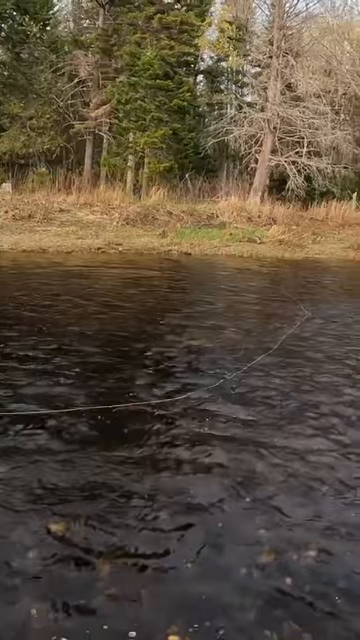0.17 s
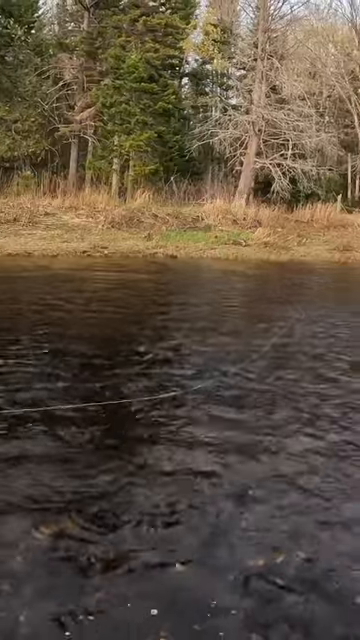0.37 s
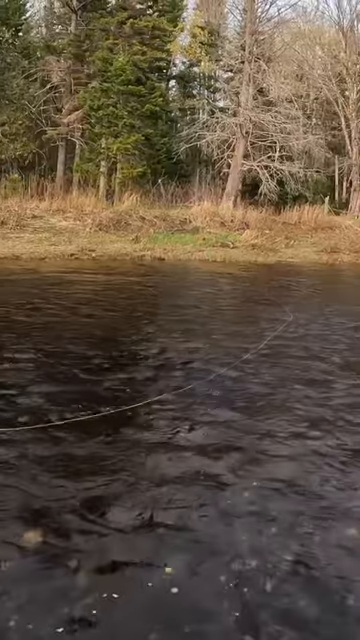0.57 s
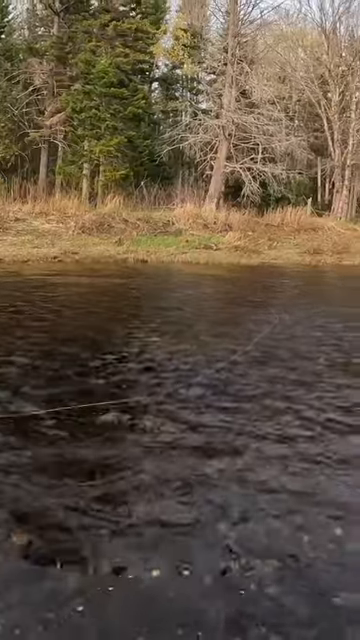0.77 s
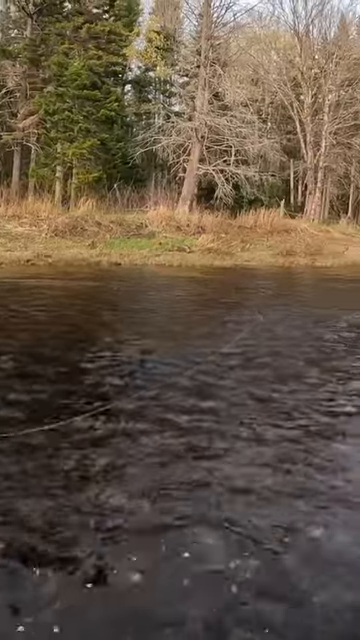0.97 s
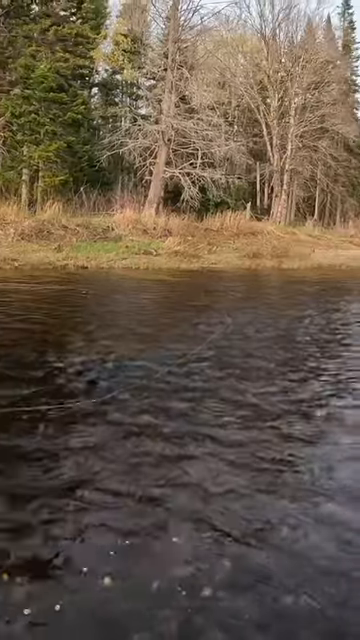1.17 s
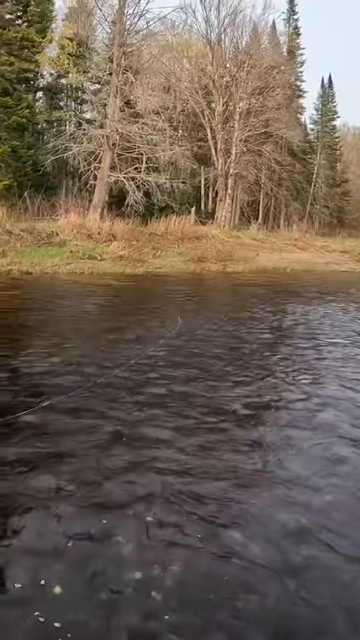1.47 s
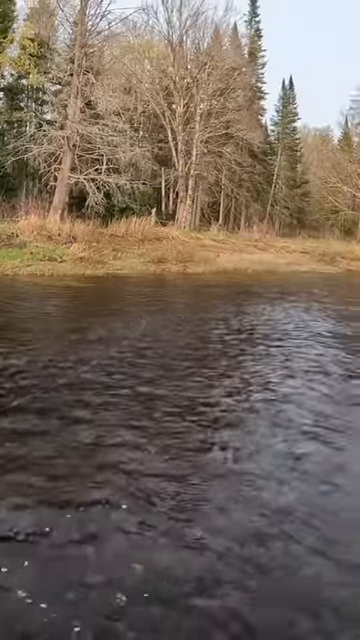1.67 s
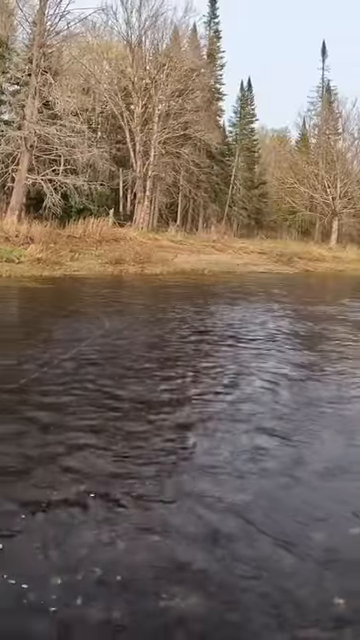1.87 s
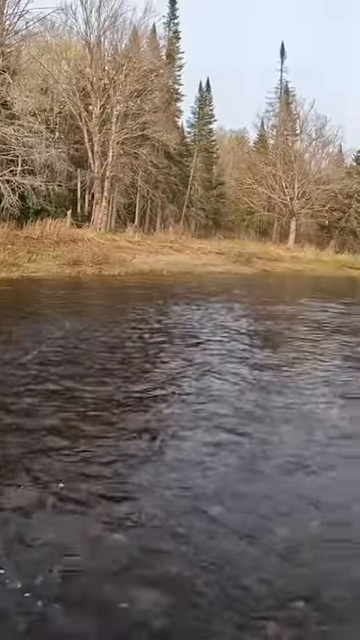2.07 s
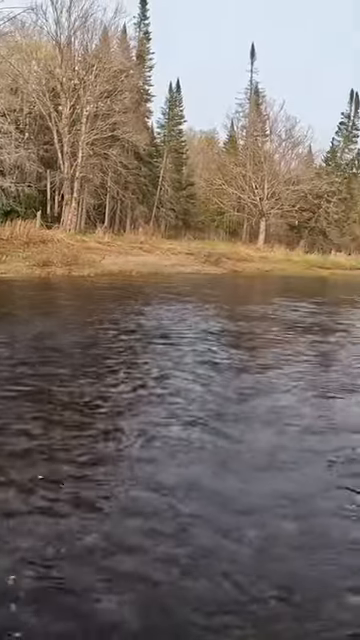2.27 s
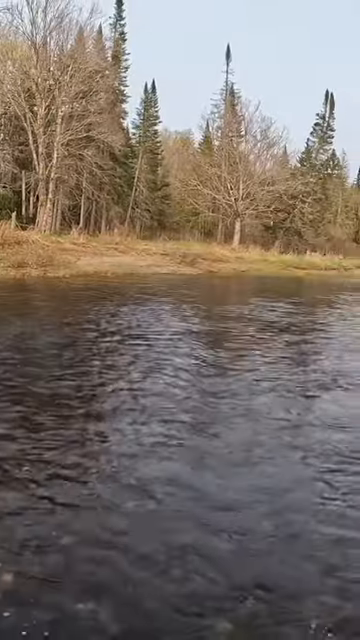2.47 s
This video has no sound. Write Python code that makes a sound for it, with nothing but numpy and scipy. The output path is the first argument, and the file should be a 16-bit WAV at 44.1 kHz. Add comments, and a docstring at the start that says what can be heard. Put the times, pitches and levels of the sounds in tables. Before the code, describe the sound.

River water bubbles, gulps and laps nearby throughout, as low wind buffets the microphone and gradually eases. Slightly to the left, a fishing reel gives a few small clicks, a tiny whirr and some final ticks, with faint line hiss.

```python
"""Fishing by a shallow river

Bubbles ring, hollows gulp and wavelets slap close by, over the steady wash of the current.
The reel clicks as its pawl (a springy catch) drops onto a gear's teeth. It whirrs briefly
as line is pulled off, and ticks again at the end.
The line hisses as it slides through the rod rings, while wind buffets the microphone."""
import sys
import numpy as np
from scipy import signal
from scipy.io import wavfile

SR = 44100
rng = np.random.default_rng(int(sys.argv[2]) if len(sys.argv) > 2 else 0)


def persist_wave(psi):
    """Save psi, clipped to +-1, as 16-bit WAV."""
    counts = np.round(np.clip(psi, -1, 1) * 32767).astype(np.int16)
    wavfile.write(sys.argv[1], SR, np.atleast_2d(counts).T)


N = 115101
T = np.arange(N) / SR

# How alike a noise is in both ears. Each row: frequency in Hz, likeness from 0 to 1.
EAR_LIKENESS = [(30, 0.7), (80, 0.99), (200, 0.59), (500, 0.98), (1200, 0.86), (2500, 0.42), (5000, 1),
                (9000, 0.58), (13000, 0)]

# Wind strength. Each row: time in seconds, rumble level in dB, flutter level in dB.
WIND_LEVELS = [(0, -37.5, -38.5), (0.2, -33.5, -41.5), (0.43, -33, -38.5), (0.72, -34.5, -43),
               (0.81, -34.5, -40.5), (0.89, -34.5, -33.5), (0.96, -27, -41), (1.07, -33, -42),
               (1.13, -34.5, -50.5), (1.19, -30, -45), (1.3, -35.5, -40), (1.5, -33, -38),
               (1.68, -43, -43.5), (1.76, -37, -43.5), (1.93, -31.5, -35.5), (2.09, -40, -39),
               (2.2, -38.5, -53), (2.35, -44, -48), (2.48, -36, -60.5), (2.61, -51.5, -54)]
# Tone of the deep rumble and of the higher flutter. Each row: frequency in Hz, relative level in dB.
RUMBLE_TONE = [(20, -5.5), (33, -1.5), (50, -7), (70, -21), (120, -41.5)]
FLUTTER_TONE = [(35, -24), (65, 2), (95, -7), (130, -9), (190, -20), (280, -29.5), (500, -38.5)]
# Single thumps of wind. Each row: time in seconds, level in dB, width in seconds.
WIND_THUMPS = [(.396, -20.5, 0.0037), (0.793, -18, 0.0038), (0.94, -19.5, 0.003), (1.361, -22.5, 0.0037),
               (1.674, -21, 0.0049), (1.934, -26, 0.0036)]

# Tone of the river's wash. Each row: frequency in Hz, relative level in dB.
WASH_TONE = [(200, -12), (370, -10.5), (500, -0.5), (700, 0.5), (1200, -5), (1900, -11), (3000, -25),
             (5000, -34.5), (7400, -30.5), (9500, -45.5), (12400, -59), (14000, -72)]
# Typical strength of the small bubbles and spray. Each row: pitch in Hz, level in dB.
SMALL_BUBBLE_LEVELS = [(380, -60), (500, -46), (700, -55), (1250, -46.5), (1800, -53), (2800, -54),
                       (4500, -59.5), (7500, -52.5)]
# The loudest bubbles, then bursting droplets. Each row: start in seconds, pitch in Hz, level in dB.
LOUD_BUBBLES = [(0.029, 499, -29.5), (0.267, 1027, -26.5), (0.288, 543, -30), (0.461, 680, -32),
                (0.464, 1370, -30.5), (0.464, 334, -29), (0.495, 698, -37), (0.555, 408, -36),
                (0.653, 780, -30.5), (0.876, 886, -32.5), (0.968, 1440, -32.5), (0.985, 720, -31.5),
                (1.121, 1264, -27), (1.122, 352, -34), (1.127, 1410, -33.5), (1.165, 646, -20),
                (1.227, 843, -29), (1.352, 1165, -28.5), (1.477, 880, -34), (1.553, 625, -33),
                (1.557, 493, -34), (1.596, 1950, -29.5), (1.664, 1250, -27), (1.721, 545, -26),
                (1.768, 1020, -33), (1.785, 526, -27), (1.792, 550, -24.5), (1.802, 675, -30),
                (1.844, 580, -29), (1.986, 693, -33.5), (2.466, 1320, -33.5), (2.478, 596, -34),
                (2.514, 704, -35), (2.575, 765, -32.5)]
BURSTING_DROPLETS = [(0.243, 3200, -43), (.4609, 3590, -33), (0.861, 7060, -47.5), (1.4283, 3450, -43),
                     (1.984, 6600, -42), (2.194, 2410, -38.5)]
# Gulping hollows. Each row: start and length in seconds, first and last pitch in Hz, level in dB.
WATER_GLUGS = [(.065, 0.038, 578, 466, -37), (.37, 0.083, 531, 428, -38), (.61, .11, 460, 520, -50),
               (.82, 0.13, 456.6, 532, -45), (1.04, 0.094, 570, 484, -46.5), (1.315, 0.064, 429, 615, -46),
               (1.67, 0.068, 385, 540, -42.5), (1.86, 0.13, 594.6, 638, -51.5),
               (1.97, 0.069, 476, 532, -47.5), (2.105, 0.065, 609, 460, -39.5),
               (2.255, 0.077, 366, 503, -43.5), (2.35, 0.078, 451.5, 624, -48.5)]
# Wavelets slapping over. Each row: start in seconds, level in dB, middle frequency in Hz.
WAVELET_SLAPS = [(.076, -38, 770), (0.271, -32.5, 1100), (.386, -39, 1060), (0.4601, -39.5, 4560),
                 (0.465, -39, 1140), (0.774, -40.5, 1060), (.957, -38.5, 1000), (1.075, -42.5, 2270),
                 (1.121, -35.5, 890), (1.165, -37.5, 890), (1.228, -37.5, 1050), (1.287, -48.5, 3700),
                 (1.348, -46, 2200), (1.473, -38, 1010), (1.653, -35.5, 1540), (1.723, -38.5, 2040),
                 (1.833, -42, 2130), (1.959, -38.5, 1210), (2.131, -35.5, 1380), (2.465, -36.5, 1390),
                 (2.509, -35, 1040)]

# Strength of the line's hiss. Each row: time in seconds, level in dB.
HISS_LEVELS = [(0, -71), (.40, -69.5), (.45, -61), (.51, -69.5), (.64, -62), (.76, -68.5), (.83, -70.5),
               (.90, -70), (.925, -59), (.99, -61.5), (1.07, -68), (1.12, -73), (1.44, -70), (1.51, -66),
               (1.68, -68), (1.96, -67.5), (2.08, -69)]
# Tone of that hiss. Each row: frequency in Hz, relative level in dB.
HISS_TONE = [(1200, -13), (2800, 1.5), (5000, 0), (7500, -6), (9500, -14.5), (12400, -18), (15000, -34)]
# The line drawing tight. Each row: time in seconds, level in dB, width in seconds.
LINE_RASPS = [(.69, -79.5, .065)]

# The reel's ringing notes. Each row: pitch in Hz, level in dB, seconds to fade by 60 dB.
REEL_NOTES = [(4420, -11, 0.0074), (5010, -6, 0.0049), (6120, -4, 0.003), (7350, -6, 0.0063),
              (9320, -12, 0.0036), (9750, -18, 0.0058), (12500, -7.5, 0.002)]
# Clicks of the pawl. Each row: start in seconds, level in dB, seconds until the bounce,
# bounce level in dB relative to the click, treble cutoff in Hz.
PAWL_CLICKS = [(0.3086, -33, 0.0011, -5.5, 7100), (0.5348, -36.5, 0.0072, -9, 14000),
               (0.565, -36.5, 0.006, -11, 15000), (0.6086, -38, 0.0046, -8, 13000),
               (1.071, -54.5, 0.0063, -2, 9000), (2.1772, -47, 0.0018, -9, 6500)]
# The spool creeping round. Each row: start in seconds, level in dB, pitch in Hz, seconds to fade 60 dB.
SPOOL_TICKS = [(2.5288, -37.5, 6040, 0.013), (2.5748, -36, 5960, 0.013), (2.6045, -36, 6200, 0.0058)]
# The notes in a tick. Each row: multiple of its pitch, level in dB, share of its fade time.
SPRING_NOTES = [(1, 0.5, 1), (1.25, -5.5, 0.42), (1.95, -14, .3)]


def from_db(db):
    """Turn decibels into a number to multiply by."""
    return 10 ** (np.asarray(db) / 20)


def rms_one(x):
    """Scale a signal so its average strength (rms) is 1."""
    return x / np.sqrt(np.mean(x ** 2) + 1e-20)


def in_time(rows):
    """Join a table's timed points with straight lines, one curve per level column."""
    times, *columns = np.transpose(rows)
    return [np.interp(T, times, column) for column in columns]


def at_hz(points, hz):
    """Read a table at any frequency, spacing the octaves evenly."""
    frequencies, values = np.transpose(points)
    return np.interp(np.log(hz), np.log(frequencies), values)


def pan(db):
    """Left and right gains that make the left ear louder by db (quieter if negative)."""
    return from_db(np.array([[db], [-db]]) / 2)


def add(out, start, sound):
    """Mix a sound in at a start time in seconds."""
    i = int(np.clip(start * SR, 0, N - 1))
    out[..., i:i + sound.shape[-1]] += sound[..., :N - i]


def drift(rate_hz):
    """A smooth random wobble of strength 1; a higher rate wobbles faster."""
    r = np.exp(-80 * np.pi * rate_hz / SR)
    slow = signal.lfilter([1], [1, -2 * r, r * r], rng.standard_normal(N // 40 + 2002))[2000:]
    return np.interp(np.arange(N) / 40, np.arange(len(slow)), rms_one(slow))


def ring(force, hz, fade_s):
    """Each push starts a pure note that fades by 60 dB in fade_s seconds."""
    r, w = from_db(-60 / (fade_s * SR)), 2 * np.pi * hz / SR
    return signal.lfilter([0, np.sin(w)], [1, -2 * r * np.cos(w), r * r], force + 1e-18)


def banded_noise(tone, flicker_db, flicker_hz):
    """Stereo noise of strength 1, made of bands that each flicker, less so in the treble."""
    out, edges = 0, np.r_[18, 30, 45, 65, np.geomspace(90, 16000, 25)]
    white = rng.standard_normal((2, 2, N + SR // 4))
    for k, (low, high) in enumerate(zip(edges, edges[1:])):
        hz = np.sqrt(low * high)
        flicker = drift(flicker_hz) / np.hypot(1, hz / 2000)
        if tone[0][0] / 2 < hz < tone[-1][0] * 2:
            band = signal.butter(3, [low, high], "band", fs=SR, output="sos")
            mid, side = signal.sosfilt(band, white[k % 2])[:, -N:]
            alike = np.clip(at_hz(EAR_LIKENESS, hz), -1, 1)
            stereo = np.sqrt(1 + alike) * mid + np.sqrt(1 - alike) * side * [[1], [-1]]
            out = out + from_db(at_hz(tone, hz) + flicker_db * flicker) * stereo
    return rms_one(out)


def wind():
    """Air hits the microphone: a lumpy rumble, a flutter and a few thumps."""
    rumble_db, flutter_db = in_time(WIND_LEVELS)
    out = from_db(rumble_db) * banded_noise(RUMBLE_TONE, flicker_db=1.5, flicker_hz=7.6)
    out += from_db(flutter_db) * banded_noise(FLUTTER_TONE, flicker_db=2.5, flicker_hz=7.6)
    for time, db, width in WIND_THUMPS:
        offset_squared = ((T - time) / width) ** 2
        out -= from_db(db) * (1 - offset_squared) * np.exp(-offset_squared / 2)
    return out * pan(db=-4.5)


def bubble(hz, db, cycles, place):
    """A bubble rings, rising slightly in pitch as it fades by 60 dB over the given cycles."""
    pitch_rise, swell_cycles = 0.029, 0.83
    turns = np.arange(int(cycles / hz * SR)) * hz / SR
    age = turns / cycles
    phase = 2 * np.pi * turns * (1 + pitch_rise * age)
    # Its place across the stream puts one ear's wave a little ahead.
    lead = place * np.interp(hz, [500, 2200, 5000], [.12, .42, .25])
    loudness = (1 - np.exp(-turns / swell_cycles)) * np.exp(-np.log(1000) * age)
    return from_db(db) * loudness * np.sin(phase + lead * np.array([[1], [-1]]))


def bubble_cloud(per_s, low_hz, high_hz, cycles):
    """Many small bubbles ring at random times, pitches and sizes."""
    out = np.zeros((2, N))
    chance, spread = rng.random((3000, 3)), rng.standard_normal((3000, 2))
    for (when, pitch, length), (size, place) in zip(chance[:int(per_s * N / SR)], spread):
        hz = low_hz * (high_hz / low_hz) ** pitch
        db = at_hz(SMALL_BUBBLE_LEVELS, hz) + 5 * min(size, 2)
        add(out, when * N / SR, bubble(hz, db, cycles * (.5 + length), place))
    return out


def glug(length, from_hz, to_hz, db):
    """A hollow in the water rings unsteadily and glides in pitch as it closes or opens."""
    age = np.linspace(0, 1, int(length * SR))
    phase = 2 * np.pi * np.cumsum(from_hz + (to_hz - from_hz) * age) / SR
    waver = 0.35 * (drift(68) + 1j * drift(68))[:len(age)]  # shakes both level and pitch
    note = rms_one(np.real((1 + waver) * np.exp(1j * phase))) / np.sqrt(2)
    return from_db(db) * np.sin(np.pi * age) * note


def slap(db, hz):
    """A wavelet folds over in a short wet burst; higher ones die away sooner."""
    rise_s, fade_s_at_1khz, width_ratio = 0.0015, 0.0063, 1.24
    t = T[:SR // 20]
    edges = np.clip([hz / width_ratio, hz * width_ratio], 100, 15000)
    band = signal.butter(2, edges, "band", fs=SR, output="sos")
    noise = rng.standard_normal(len(t)) + 0.29 * rng.standard_normal((2, len(t)))
    loudness = (1 - np.exp(-t / rise_s)) * np.exp(-t / fade_s_at_1khz * np.sqrt(hz / 1000))
    return from_db(db) * loudness * rms_one(signal.sosfilt(band, noise))


def river():
    """The current gurgles and spits close by, over its wash farther off."""
    water = bubble_cloud(per_s=230, low_hz=429, high_hz=2324, cycles=32.5)
    spray = bubble_cloud(per_s=300, low_hz=1793, high_hz=7370, cycles=18)
    for start, hz, db in LOUD_BUBBLES:
        add(water, start, bubble(hz, db, cycles=21.9, place=1.05 * rng.standard_normal()))
    for start, length, from_hz, to_hz, db in WATER_GLUGS:
        add(water, start, glug(length, from_hz, to_hz, db))
    for start, hz, db in BURSTING_DROPLETS:
        add(spray, start, bubble(hz, db, cycles=38, place=0.79 * rng.standard_normal()))
    for start, db, hz in WAVELET_SLAPS:
        add(water, start, slap(db, hz))
    wash = from_db(-51) * banded_noise(WASH_TONE, flicker_db=6, flicker_hz=25.5)
    return water + wash + spray * pan(db=2)


def fishing_line():
    """Line slides through the rod rings with a grainy hiss, and rasps as it draws tight."""
    level_db, = in_time(HISS_LEVELS)
    grain_db = 3 * drift(rate_hz=130)
    hiss = from_db(level_db) * banded_noise(HISS_TONE, flicker_db=7, flicker_hz=51)
    band = signal.butter(3, [7500, 13000], "band", fs=SR, output="sos")
    rasp = rms_one(signal.sosfilt(band, rng.standard_normal(N) + rng.standard_normal((2, N))))
    tightness = sum(from_db(db) * np.exp(-((T - time) / width) ** 2 / 2) for time, db, width in LINE_RASPS)
    return from_db(grain_db) * (hiss + tightness * rasp) * pan(db=2.5)


def contact():
    """The force of metal hitting metal: a snap, then a tiny rattle that differs at each ear."""
    rattle_db, rattle_s = -9.5, 0.002
    t = T[:SR // 20]
    shared, per_ear = rng.standard_normal(len(t)), rng.standard_normal((2, len(t)))
    force = from_db(rattle_db) * (shared + per_ear / 2) * np.exp(-t / rattle_s) / 2
    force[:, 0] += 1  # the snap
    return force


def reel_body(force):
    """A knock makes the reel ring; we hear both, with the bass cut away."""
    rings = sum((-1) ** k * from_db(db) * ring(force, hz, fade_s)
                for k, (hz, db, fade_s) in enumerate(REEL_NOTES))
    return signal.sosfilt(signal.butter(2, 2500, "high", fs=SR, output="sos"), rings + force)


def reel_clicks():
    """The pawl drops on a tooth and bounces once."""
    force = np.zeros((2, N))
    for start, db, delay, bounce_db, cutoff_hz in PAWL_CLICKS:
        soften = signal.butter(2, cutoff_hz, fs=SR, output="sos")
        add(force, start, from_db(db) * signal.sosfilt(soften, contact()))
        add(force, start + delay, from_db(db + bounce_db) * signal.sosfilt(soften, contact()))
    return reel_body(force)


def reel_ticks():
    """Single teeth scrape past the pawl and leave its spring ringing."""
    out, snap_db = np.zeros((2, N)), -2.5
    for start, db, hz, fade_s in SPOOL_TICKS:
        force = contact()
        push = np.c_[force[:, :1], force[:, 1:] / 2]  # the spring takes the snap and half the rattle
        rings = sum(from_db(note_db) * ring(push, hz * ratio, fade_s * share)
                    for ratio, note_db, share in SPRING_NOTES)
        add(out, start, from_db(db) * (rings + from_db(snap_db) * force))
    return out


def reel_whirr():
    """A tug spins the spool: a fast run of teeth, hard at first, then coasting."""
    start_s, end_s, teeth_per_s = .9133, 1.09, 235
    force_db, hold_s, fall_db_per_s, coast_db = -36, 0.0051, 703, -28
    peak_hz, width_hz = 6930, 660
    force = np.zeros((2, N))
    for k, (jitter, uneven_db) in enumerate(rng.standard_normal((60, 2))):
        age, tooth = (k + jitter / 10) / teeth_per_s, contact()
        # A quick drop to coasting, on top of a slow fade of 35 dB a second.
        fall_db = np.clip(-fall_db_per_s * (age - hold_s), coast_db, 0) - 35 * age
        if age < end_s - start_s:
            add(force, start_s + age, from_db(force_db + fall_db + uneven_db) * tooth)
    narrow_band = signal.iirpeak(peak_hz, peak_hz / width_hz, fs=SR)
    return reel_body(signal.lfilter(*narrow_band, force))


def scene():
    """Mix river, wind and line with the reel, which sits to the left."""
    background = river() + wind()
    reel = (reel_clicks() + reel_ticks() + reel_whirr()) * pan(db=6)
    return background + fishing_line() + reel


def record(dry):
    """Cut the highest treble, by at least 60 dB from 16500 Hz up."""
    return signal.sosfilt(signal.cheby2(12, 60, 16500, fs=SR, output="sos"), dry)


dry = scene()
out = record(dry)
persist_wave(out)
```